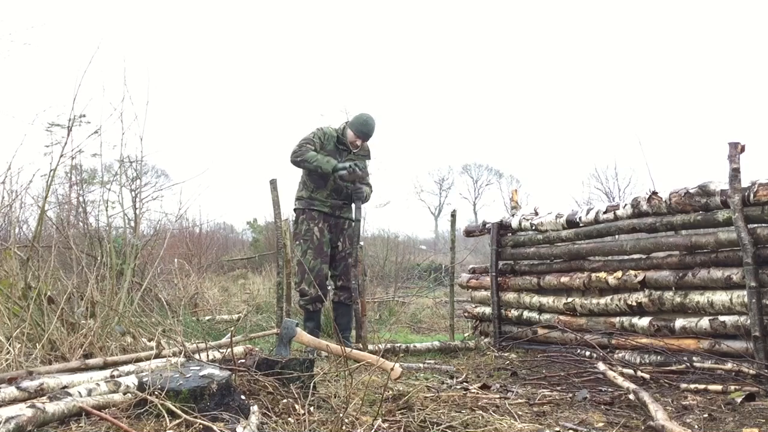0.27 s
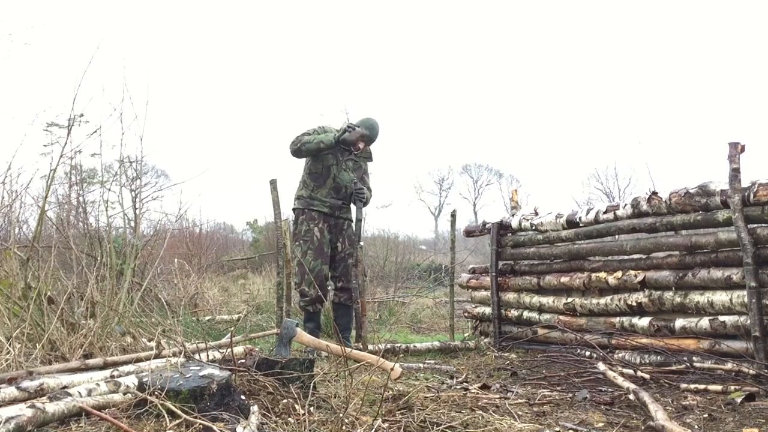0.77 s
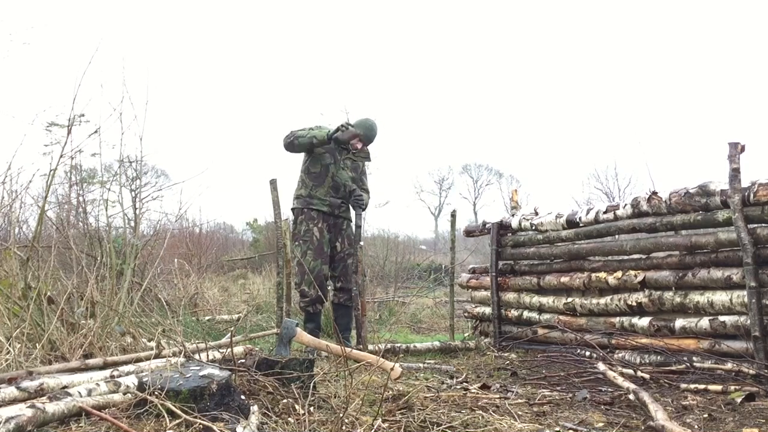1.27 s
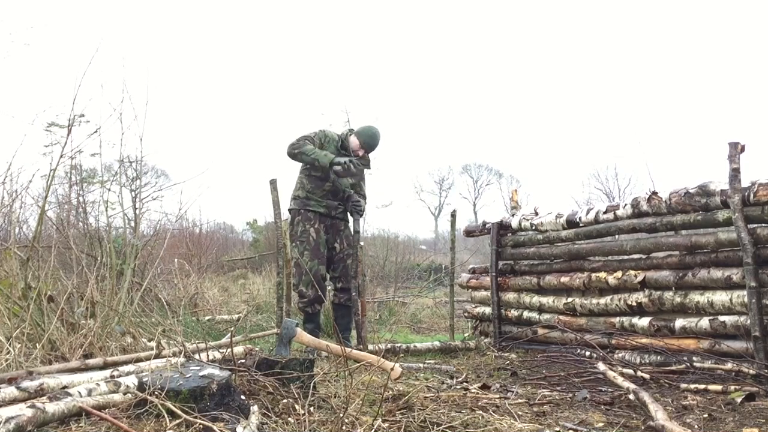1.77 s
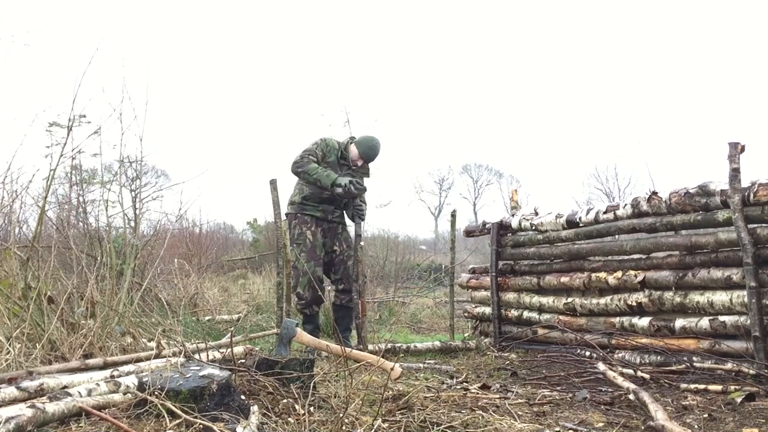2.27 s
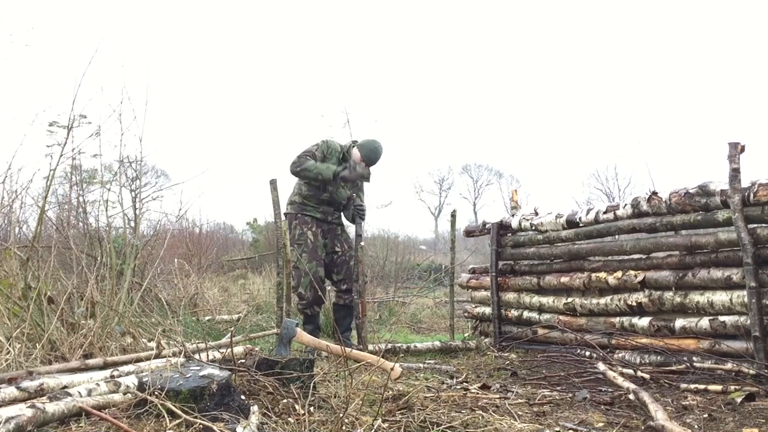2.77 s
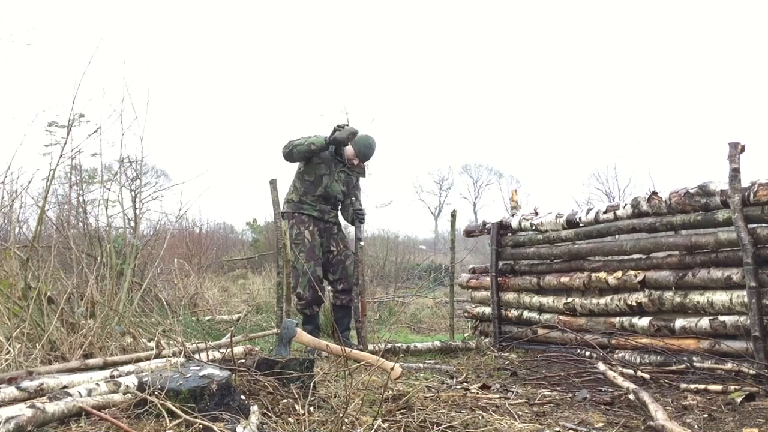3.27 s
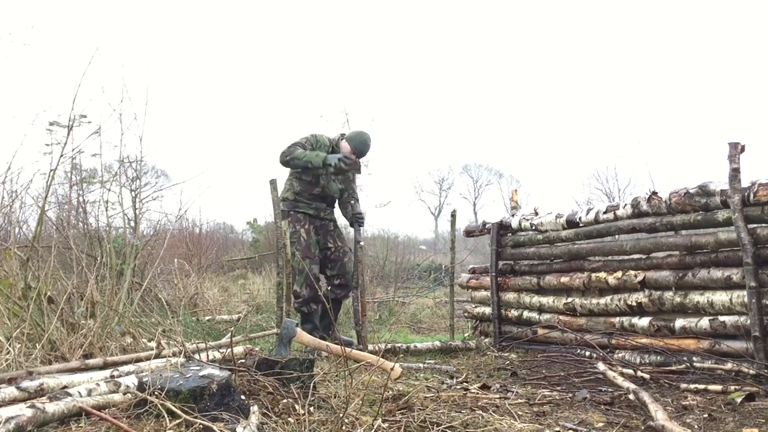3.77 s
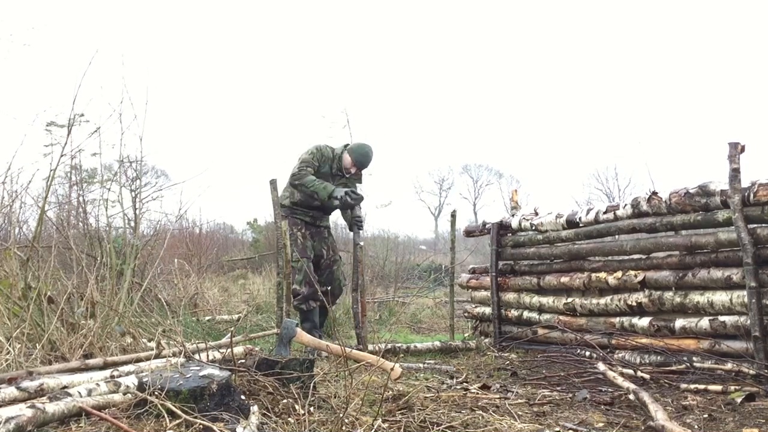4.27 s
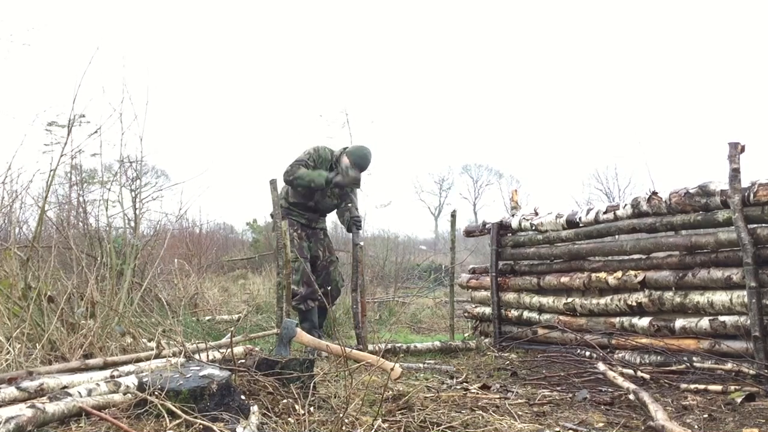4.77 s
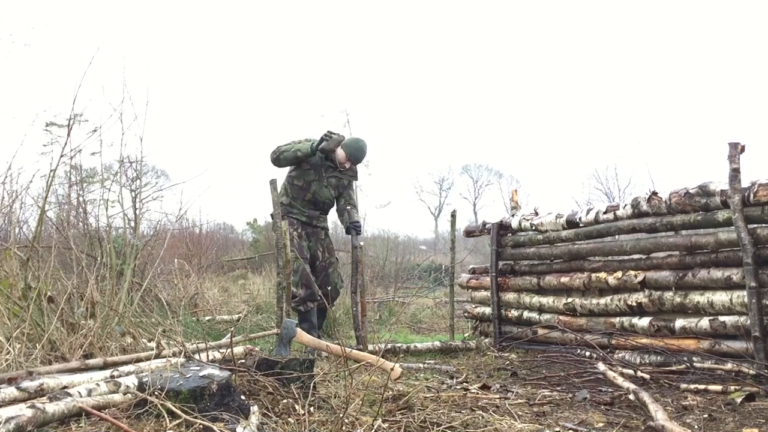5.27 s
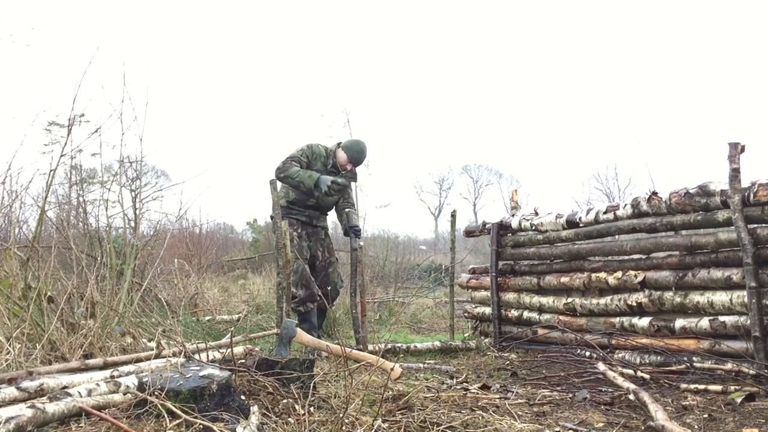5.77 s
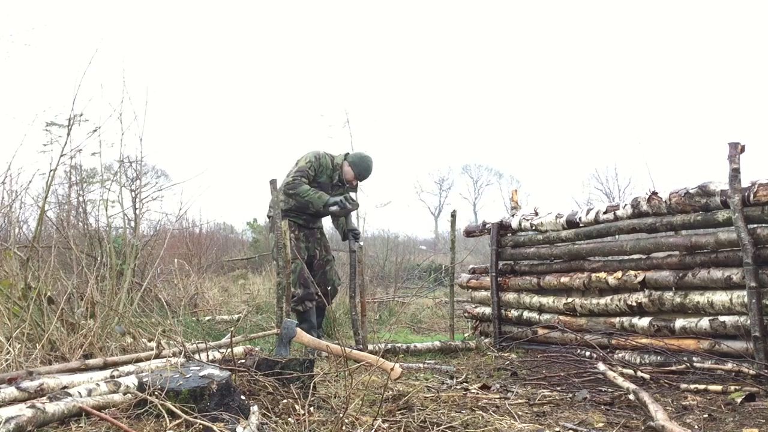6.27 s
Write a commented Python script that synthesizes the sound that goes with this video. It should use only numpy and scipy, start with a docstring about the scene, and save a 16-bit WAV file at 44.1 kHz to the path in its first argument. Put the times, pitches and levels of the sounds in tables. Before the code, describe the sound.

Outdoors, a wooden stake is hammered with short woody knocks about every two-thirds of a second, amid soft wind buffeting and faint distant hum.

```python
"""Low wind rumble on the microphone and a faint far hiss come first; then ten mallet blows drive a
wooden peg into soft ground, outdoors among brush and a stack of logs, and a distant engine hums.
Each blow excites damped modes of peg and mallet; crushed fibres crackle as enveloped noise. Ground,
logs and brush return the blows; wind, road and leaves are shaped noise, the engine a single tone."""
import sys
import numpy as np
from scipy import signal
from scipy.fft import rfft, irfft
from scipy.io import wavfile

SR = 44100
rng = np.random.default_rng(int(sys.argv[2]) if len(sys.argv) > 2 else 0)


def volts_from_decibels(level):
    """Turn decibel levels (scalar or array-like) into linear amplitude factors."""
    exponent = np.asarray(level, float) / 20
    return 10 ** exponent


def master(y):
    """Save y as 16-bit WAV."""
    cut = np.clip(np.atleast_2d(y).T, -1, 1)
    pcm = np.round(cut * 32767)  # scale
    wavfile.write(sys.argv[1], SR, pcm.astype(np.int16))


N = 286694

# mallet blows: t/s, knock level/dB, then relative to the knock: bending ring level/dB,
# bright knock level/dB, crack level/dB
BLOWS = [(0.375, -37.5, -8, -17, -11), (0.985, -25, -7, 3, -31), (1.623, -21, -21, 1, -13),
         (2.26, -11.5, -21, -4, -22), (2.913, -16, -10, -0.5, -11.5), (3.571, -12.5, -18, 1, -13.5),
         (4.254, -13, -12, 0, -13), (4.921, -10, -15.5, -2, -26.5), (5.612, -11, -13.5, -0.5, -14.5),
         (6.314, -9.5, -17, -4.5, -26)]
# spectrum of crushing fibres, also used for the noise before each blow:
# f/Hz, relative density level/dB per Hz
CRUSH_SPECTRUM = [(880, 0.5), (1500, -4), (2510, -5), (3180, 0.5), (3520, -3), (6560, -7), (10300, -13),
                  (13800, -14), (16000, -17)]


def rms_one(x):
    """Normalisation: scales a signal to unit rms."""
    return x / np.sqrt(np.mean(x ** 2) + 1e-20)


def in_time(rows):
    """Linear interpolation: the columns of a time table, one value a sample."""
    s, *columns = np.transpose(rows)
    return [np.interp(np.arange(N) / SR, s, column) for column in columns]


def coloured(spectrum):
    """Spectral shaping: white noise weighted in frequency gives steady coloured noise of unit rms."""
    hz, level_db = np.transpose(spectrum)
    bins_hz = np.maximum(np.arange(N // 2 + 1) * SR / N, 1)
    shape = volts_from_decibels(np.interp(np.log(bins_hz), np.log(hz), level_db, left=-120, right=-120))
    white = rng.standard_normal(N)
    return rms_one(irfft(rfft(white) * shape, N))


def drift(rate_hz):
    """Random modulation: noise through a double one-pole low-pass wanders slowly with unit rms."""
    r = np.exp(-2 * np.pi * rate_hz / SR)
    white = rng.standard_normal(N + SR)     # the first second settles the filter
    return rms_one(signal.lfilter([1], [1, -2 * r, r * r], white)[SR:])


def clicks(times, gains):
    """Impulsive excitation: single-sample impulses at given moments."""
    out = np.full(N, 1e-18)
    at = np.round(np.asarray(times) * SR).astype(int)
    np.add.at(out, np.clip(at, 0, N - 1), gains)
    return out


def ring(x, hz, t60):
    """Damped resonator: a unit impulse sets a decaying sine of height 1 ringing."""
    r, w = volts_from_decibels(-60 / (t60 * SR)), 2 * np.pi * hz / SR
    return signal.lfilter([0, np.sin(w)], [1, -2 * r * np.cos(w), r * r], x)


def dying(x, t60, rise_s):
    """Exponential decay: an envelope swells briefly after each impulse and dies away."""
    r, q = volts_from_decibels(-60 / (t60 * SR)), np.exp(-1 / (rise_s * SR))
    decay = signal.lfilter([1], [1, -r], x)
    return signal.lfilter([1 - q], [1, -q], decay)


def road(slow):
    """Incoherent sum of far tyre noise: a nearly smooth roar with slow level drift."""
    spectrum = [(180, -70), (300, -2), (365, -4), (457, -10), (507, -14), (662, -8), (1080, -4.5),
                (1510, -13), (3500, -28.5), (4550, -85), (7700, -120)]     # tyre roar: f/Hz, relative density level/dB per Hz
    level_db = -66 + 0.63 * slow + 0.8 * drift(6)
    return volts_from_decibels(level_db) * coloured(spectrum)


def leaves(slow):
    """Incoherent sum of leaf noise: a nearly smooth hiss that partly shares the road's drift."""
    spectrum = [(1470, 2), (2500, -4), (3600, -2), (4950, -6.5), (5310, -5), (9660, -8.5), (10400, -13),
                (12000, -7), (12400, -12.5), (15200, -9), (16000, -81.5)]     # leaf hiss: f/Hz, relative density level/dB per Hz
    level_db = -72.5 + 0.6 * slow + 0.5 * drift(6.8)
    return volts_from_decibels(level_db) * coloured(spectrum)


def background():
    """Common modulation: road and leaves breathe together on one slow drift."""
    slow = drift(0.46)
    return road(slow) + leaves(slow)


def hum():
    """Periodic radiation: one low order of a far engine, a sine with slight phase wander."""
    # swelling and fading as the wind carries the sound: t/s, rms level/dB
    levels = [(3.2, -67), (3.4, -53), (3.65, -54), (3.95, -73), (4.29, -44), (4.46, -56.5), (4.6, -45),
              (5.0, -43.5), (5.39, -47.5), (5.62, -62), (5.78, -48.5), (6.12, -66), (6.38, -41), (6.5, -48)]
    order_hz = 69.5
    phase = 2 * np.pi * order_hz * np.arange(N) / SR + 0.25 * drift(1.3)
    return np.sqrt(2) * volts_from_decibels(in_time(levels)[0]) * np.sin(phase)


def wind():
    """Turbulent pressure on the capsule: lumpy rumble, faster flutter above it, and single eddies."""
    # gusts and lulls: t/s, rumble level/dB before the random lumps
    gusts = [(0.0, -61.5), (0.16, -53), (0.33, -60.5), (0.45, -46.5), (0.83, -58), (1.3, -52.5),
             (2.19, -51), (2.55, -57), (2.86, -44), (3.1, -55), (3.51, -48.5), (4.25, -48), (5.34, -49),
             (6.5, -52.5)]
    # flutter: t/s, level/dB relative to the rumble, before its flicker
    flutter = [(0.0, -9), (2.5, -10), (3.5, -14.5), (4.8, -21.5), (6.5, -13.5)]
    # spectrum of the turbulence: f/Hz, relative density level/dB per Hz
    spectrum = [(15, -57), (25, -36.5), (53, 2.5), (73, -3.5), (141, -6.5), (184, -7), (367, -19.5),
                (460, -34.5), (600, -20), (780, -74), (1320, -120)]
    # strongest eddies: t/s, level/dB of the broad pulse, f/Hz
    buffets = [(0.683, -28.5, 88), (0.731, -35, 72), (1.208, -36.5, 70), (1.342, -37, 103),
               (1.381, -39, 78), (1.496, -35.5, 156), (1.795, -34.5, 76), (2.02, -30.5, 91),
               (2.061, -40, 111), (2.209, -34, 76.5), (2.749, -39, 119), (2.844, -40, 99),
               (3.203, -34.5, 72), (3.361, -39, 68.5), (3.465, -34.5, 105), (3.675, -36.5, 70.4),
               (4.761, -34, 63), (5.797, -39.5, 86.5)]
    (rumble_db,), (flutter_db,) = in_time(gusts), in_time(flutter)
    noise = coloured(spectrum)
    low = signal.sosfiltfilt(signal.butter(2, 110, fs=SR, output="sos"), noise)
    lumps_db, flicker_db = 3 * drift(14), 3 * drift(25)
    rumbling = volts_from_decibels(lumps_db) * rms_one(low)
    fluttering = volts_from_decibels(flutter_db + lumps_db + flicker_db) * rms_one(noise - low)
    out = volts_from_decibels(rumble_db) * (rumbling + fluttering)
    t = np.arange(N) / SR
    phases = rng.uniform(0, 2 * np.pi, len(buffets))
    for (s, level_db, hz), phase in zip(buffets, phases):
        near = slice(int((s - 0.1) * SR), int((s + 0.1) * SR))
        cycles = (t[near] - s) * hz
        # a few cycles with a sharp core that spreads the thud upward in pitch
        pulse = np.exp(-(cycles / 0.73) ** 2) + 0.27 * np.exp(-(cycles / 0.12) ** 2)
        out[near] += volts_from_decibels(level_db) * pulse * np.cos(2 * np.pi * cycles + phase)
    return out


def twigs():
    """Resonant filtering: brief noise bursts through broad resonances tick and rustle."""
    # twigs and clothing: t/s, drive level/dB, f/Hz, t60/s of the burst
    tick_table = [(0.109, -56, 5000, 0.01), (0.511, -58, 5000, 0.0085), (1.85, -70, 5000, .02),
                  (1.225, -61, 4000, .015), (1.589, -61, 3500, 0.012), (3.03, -64.5, 4000, 0.021),
                  (3.116, -58, 8540, 0.0086), (3.80, -66.5, 11200, 0.2), (3.834, -64, 8050, 0.052),
                  (3.98, -69, 8000, 0.068), (4.47, -69, 9040, 0.09)]
    noise, out = rng.standard_normal(N), 0
    for s, drive_db, hz, t60 in tick_table:
        burst = dying(clicks([s], volts_from_decibels(drive_db)), t60, rise_s=t60 / 25) * noise
        out = out + ring(burst, hz, 3.6 / hz)
    return out


def squeak():
    """Phase modulation: a short, thin high tone wavers under a flat-topped envelope."""
    # the squeak: t/s of its start, peak level/dB, f/Hz, length/s
    squeak_table = [(5.7912, -65.5, 11698.5, 0.014)]
    s, level_db, hz, length = squeak_table[0]
    t = np.arange(N) / SR
    envelope = np.exp(-((t - s - length / 2) / (length / 2)) ** 4)
    return volts_from_decibels(level_db) * envelope * np.sin(2 * np.pi * hz * t + 0.8 * drift(150))


def noise_before_blows():
    """Amplitude modulation: faint noise swells just before each blow and stops at it."""
    t = np.arange(N) / SR
    envelope = 0
    for at in np.transpose(BLOWS)[0]:
        # strongest 9.2 ms ahead of the blow, silent from the blow on
        envelope = envelope + np.exp(-((t - at + 0.0092) / 0.032) ** 2) * (t < at)
    return volts_from_decibels(-67.0) * envelope * coloured(CRUSH_SPECTRUM)


def scatter():
    """Diffuse scattering: near stems return a short grainy tail, far brush a fainter, slower-rising one."""
    # spectrum thrown back by the brush: f/Hz, relative density level/dB per Hz
    spectrum = [(260, -35.5), (450, -9.5), (664, -0.5), (782, -15.5), (1260, -18.5), (1490, -31.5),
                (1650, -20), (2910, -32), (9070, -39.5), (16000, -44)]
    s, knock_db = np.transpose(BLOWS)[:2]
    blows = clicks(s, volts_from_decibels(0.2 * knock_db))      # glancing blows knock less but scatter nearly as much
    near = volts_from_decibels(-27.5) * dying(blows, 0.13, rise_s=0.0049)
    far = volts_from_decibels(-47.0) * dying(blows, 0.11, rise_s=0.012)
    grain = volts_from_decibels(1.8 * drift(200))
    return (near + far) * grain * coloured(spectrum)


def echoes(x):
    """Specular reflection: ground and log stack add duller, later copies to the direct sound."""
    # arrivals after the direct sound: delay t/ms, relative level/dB before dulling
    arrivals = [(3.7, -3), (6.4, -10.5), (11.0, -20.5), (21.0, -26), (34.0, -35.5)]
    dull = signal.lfilter([0.6], [1, -0.4], x)
    samples = np.arange(N)
    out = x
    for delay_ms, level_db in arrivals:
        out = out + volts_from_decibels(level_db) * np.interp(samples - delay_ms * SR / 1000, samples, dull)
    return out


def splinters():
    """Fracture noise: crushed and splitting fibres crackle densely and unevenly, dying after each crack."""
    # crushing under the blows and splitting just after the early, glancing ones: t/s, drive level/dB
    cracks = [(0.3698, -33), (0.3784, -32.5), (0.9827, -35.5), (0.9916, -28.5), (1.6231, -29),
              (1.6382, -35), (2.2596, -35), (2.9114, -35), (3.5718, -33.5), (4.253, -32), (4.9188, -34.5),
              (5.6119, -36), (6.3115, -35.5)]
    s, drive_db = np.transpose(cracks)
    envelope = dying(clicks(s, volts_from_decibels(drive_db)), t60=0.042, rise_s=0.00061)
    crackle = volts_from_decibels(2.9 * drift(360) + 1.3 * drift(1500))
    return envelope * coloured(CRUSH_SPECTRUM) * crackle


def peg():
    """Modal superposition: each blow rings all modes; how it lands tilts their strengths."""
    # long modes are the peg bending, short ones the contact: f/Hz, relative level/dB, t60/s
    modes = [(137.2, -10, 0.07), (196.3, -8, 0.062), (273, -2, 0.13), (345.7, -1, 0.086),
             (393.5, 3.5, 0.14), (426, -16, 0.2), (496.2, -11.5, 0.148), (591, -3, .1), (667, 1, 0.13),
             (734, -6.5, 0.03), (805, -6, 0.045), (951, 2, 0.057), (1179.6, -4, 0.041), (1290, -4.5, 0.021),
             (1439, -6, 0.018), (1755, 0.5, 0.0127), (1880, -32.5, 0.05), (2248, -12.5, 0.0083),
             (2360, 3.5, 0.0076), (2650, -2, 0.0068), (3116, -3.5, 0.016), (3630, 2, 0.0061),
             (1017, -12, 0.044)]
    # where each colour of a blow acts: f/Hz
    colour_hz = [150, 300, 640, 1050, 1800, 3000]
    s, knock_db, bend_db, bright_db, crack_db = np.transpose(BLOWS)
    # the thump grows more slowly than the knock: -23 dB at a 0 dB knock, 0.33 dB per dB of knock
    thump_db = -23.0 + (0.33 - 1) * knock_db
    # the deepest push into the soil simply follows the knock
    colour = np.transpose([0 * s, thump_db, bend_db, 0 * s, bright_db, crack_db])
    uneven_db = 2.2 * rng.standard_normal((len(s), len(modes)))
    out = 0
    for k, (hz, level_db, t60) in enumerate(modes):
        tilt_db = [np.interp(np.log(hz), np.log(colour_hz), row) for row in colour]
        # the peg bends only after the mallet has pushed for a moment: low modes start late
        late_s = max(1.203 / hz - 0.0022, -0.0006)
        # the mallet bounces and strikes a second time, brighter, so the bright modes join a little later
        late_s += 0.0031 * (hz > 1400)
        strength = volts_from_decibels(knock_db + tilt_db + level_db + uneven_db[:, k])
        sign = (-1) ** k
        out = out + sign * ring(clicks(s + late_s, strength), hz, t60)
    return out


def scene():
    """Linear superposition: the pressures of all sources add at one microphone."""
    surroundings = background() + hum() + wind() + twigs() + squeak()
    blows = noise_before_blows() + scatter() + echoes(splinters() + peg())
    return (surroundings + blows)[None]


def low_pass(x):
    """Removes everything above the highest recorded frequency."""
    return signal.sosfilt(signal.butter(12, 16820, fs=SR, output="sos"), x)


def record(dry):
    """High-pass filtering: the microphone cuts the deepest bass, below 40 Hz."""
    mix = signal.sosfilt(signal.butter(2, 40, "high", fs=SR, output="sos"), dry)
    return low_pass(mix)


dry = scene()
out = record(dry)
master(out)
```